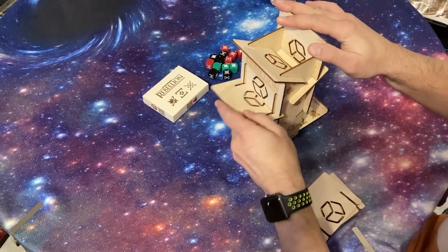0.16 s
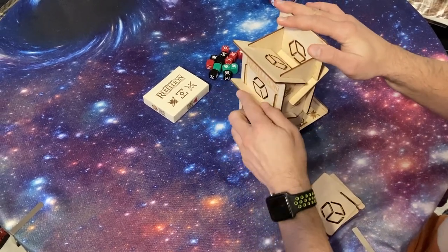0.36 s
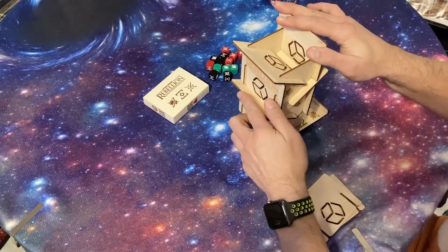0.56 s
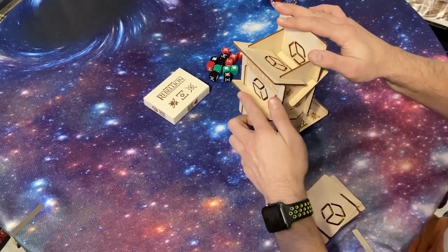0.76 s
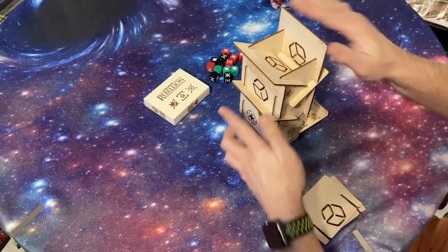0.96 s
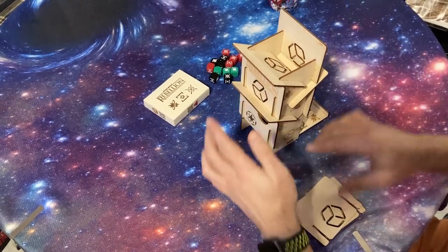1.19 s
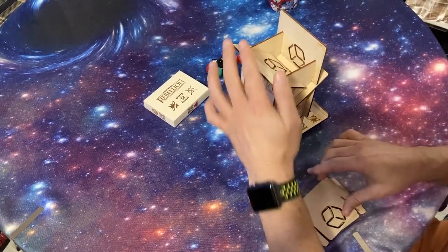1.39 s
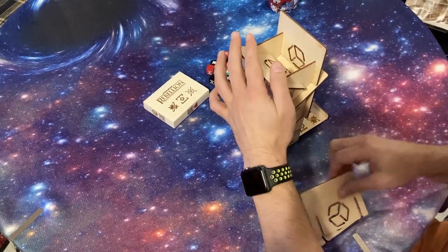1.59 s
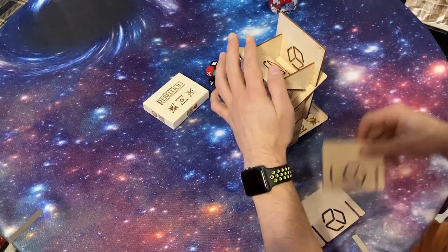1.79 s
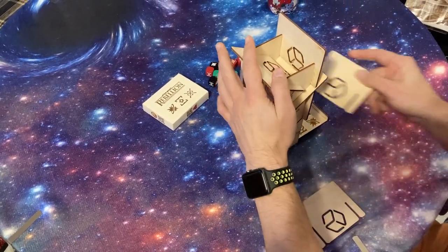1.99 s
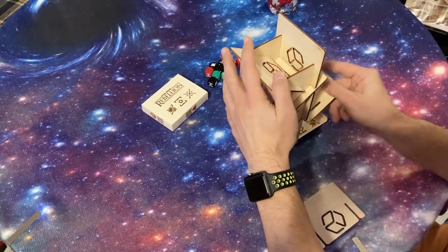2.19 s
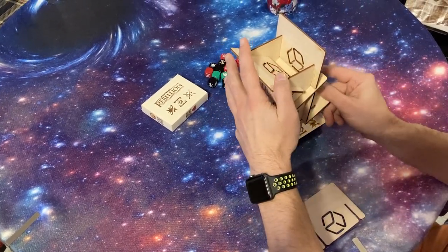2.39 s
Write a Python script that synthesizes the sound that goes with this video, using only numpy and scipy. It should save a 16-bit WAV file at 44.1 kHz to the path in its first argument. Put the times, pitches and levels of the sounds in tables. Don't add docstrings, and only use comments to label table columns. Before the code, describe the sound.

Thin plywood scraping into place, one hard wooden double snap, then faint rubbing and light taps

```python
import sys
import numpy as np
from scipy import signal
from scipy.fft import rfft, irfft, next_fast_len
from scipy.io import wavfile
from scipy.ndimage import uniform_filter1d

SR = 44100
rng = np.random.default_rng(int(sys.argv[2]) if len(sys.argv) > 2 else 0)


def to_wav(sig):
    pcm = np.clip(np.atleast_2d(sig), -1, 1) * 32767
    pcm = np.round(pcm).astype(np.int16)
    wavfile.write(sys.argv[1], SR, pcm.T)


def makeup_ratio(level_db):
    decades = np.asarray(level_db, float) / 20
    return 10 ** decades


N = 108045


def evened(x):
    return x / np.sqrt(np.mean(x ** 2) + 1e-20)


def peaked(x):
    return x / np.max(np.abs(x))


def read(points, hz):
    f, value = np.transpose(points)
    return np.interp(np.log(hz + 1), np.log(f + 1), value)


def colour(x, gain):
    size = next_fast_len(x.shape[-1] + 2048)
    spectrum = rfft(x, size) * gain(np.fft.rfftfreq(size, 1 / SR))
    return irfft(spectrum, size)[..., :x.shape[-1]]


def resonate(x, hz, width_hz):
    r = np.exp(-np.pi * width_hz / SR)
    return signal.lfilter([1 - r, 0, r - 1], [1, -2 * r * np.cos(2 * np.pi * hz / SR), r * r], x)


def drift(seconds, size):
    window = np.hanning(4410) ** max((0.02 / seconds) ** 2, 0.1)
    return evened(signal.oaconvolve(rng.standard_normal(size), window, "same"))


# hz, level_db (per Hz)
ROOM_SPECTRUM = [(28, -25), (55, 3), (80, -24.5), (118, -13.5), (170, -21.5), (400, -29), (900, -41),
                 (3000, -49.5), (15000, -54)]
# hz, likeness (0 to 1)
PORT_LIKENESS = [(60, .98), (300, .88), (700, .6), (2000, .5), (6000, .6), (7500, .95)]


def room_tone():
    room_db, swell_db, swell_s = -60, 3, 0.05
    fan_db, fan_hz, fan_width_hz = -81, 678, 3.3
    shape = lambda hz: makeup_ratio(read(ROOM_SPECTRUM, hz))
    like = lambda hz: np.clip(read(PORT_LIKENESS, hz), 0, 1)
    unlike = lambda hz: shape(hz) * np.sqrt(1 - like(hz) ** 2)
    a, b = rng.standard_normal((2, N))
    left = colour(a, shape)
    right = colour(left, like) + colour(b, unlike)
    air = evened(np.array([left, right]))
    hum = colour(air, lambda hz: 1 / (1 + (hz / 200) ** 4))
    swell = makeup_ratio(swell_db * drift(swell_s, N)) - 1
    fan = evened(resonate(rng.standard_normal(N), fan_hz, fan_width_hz))
    return makeup_ratio(room_db) * (air + hum * swell) + makeup_ratio(fan_db) * fan


def body(x, modes, wander_db=0.0):
    wander_s = 0.014
    out = 0
    for k, (hz, width_hz, db) in enumerate(modes):
        drive = x
        if wander_db:
            drive = x * makeup_ratio(wander_db * drift(wander_s, len(x)))
        ring = resonate(resonate(drive, hz, 1.7 * width_hz), hz, 1.7 * width_hz)
        out = out + (-1) ** k * makeup_ratio(db) * ring / np.sqrt(width_hz)
    return out


def slips(size):
    slips_per_s = 4000
    happens = rng.random(size) < slips_per_s / SR
    n = rng.standard_normal(size)
    return evened(happens * np.sign(n) + 0.24 * n)


# hz, level_db
FIBRE_HISS = [(1500, -45), (4000, -6.5), (5600, -11), (7200, -2.5), (9200, 1), (11500, -3), (14000, -4),
              (16000, -13.5)]


def hiss(x):
    return evened(colour(x, lambda hz: makeup_ratio(read(FIBRE_HISS, hz))))


def rub(strokes, modes, rumble_db=-12):
    fade_s, grain_db, wander_db = 0.007, 2, 3.6
    rumble_hz, rumble_width_hz = 294.7, 360
    t, press, speed = np.arange(N) / SR, np.zeros(N), np.zeros(N)
    for rows in strokes:
        s, press_db, hiss_db = np.transpose(rows)
        gate = np.clip(np.minimum(t - s[0] + fade_s, s[-1] + fade_s - t) / fade_s, 0, 1)
        press += gate * makeup_ratio(np.interp(t, s, press_db))
        speed += gate * makeup_ratio(np.interp(t, s, press_db + hiss_db))
    grain = makeup_ratio(grain_db * evened(uniform_filter1d(rng.standard_normal(N), 220)))
    clicks = slips(N) * grain
    low_noise, fibre_noise = rng.standard_normal((2, N))
    wood = press * evened(body(clicks, modes, wander_db))
    fibres = speed * hiss(fibre_noise * grain + 0.5 * clicks)
    rumble = press * evened(resonate(low_noise, rumble_hz, rumble_width_hz))
    return wood + fibres + makeup_ratio(rumble_db) * rumble


# hz, width_hz, level_db
TOWER_MODES = [(712.6, 250, -11.5), (1063, 190, 1.5), (1270, 300, 4.5), (1430, 210, 7.5),
               (1629, 180, -10.5), (2130, 690, 2.5), (2400, 300, -1), (2666, 200, -3), (6750, 520, -18.5),
               (3600, 110, -6), (4050, 860, -5), (4860, 1500, -6)]
# start_s, pressure_db, hiss_db (speed hiss over pressure)
SLOT_RUBS = [
    [(0, -60, -35), (.062, -79, -33), (.072, -64, -11), (.15, -62.5, -3.5), (.205, -43.5, -12),
     (.213, -42, -3.5), (.285, -40, -8), (.3, -53.5, -4), (.318, -44, -6.5), (.331, -43.5, 0.5)],
    [(.39, -51, -29.5), (.484, -51, -8), (.52, -56.5, -22.5), (.56, -64, -27.5)],
    [(2.376, -63.5, -21), (2.414, -66, -11), (2.45, -46.5, -23.5)],
]


def slot_scrapes():
    return rub(SLOT_RUBS, TOWER_MODES)


# hz, level_db, t60_s
TABLE_MODES = [(151, -13, 0.15), (194.3, -3.5, 0.19), (235.7, -7.5, 0.21), (269.5, 2, 0.078),
               (314.2, 0.5, 0.15), (405.3, 2.5, 0.093), (531.8, -10.5, 0.12), (692, -7.5, 0.12)]


def knock(start_s, db, ring_hz, chatter_s, thump_db=-58.0, crack_db=-3, body_db=0.0, first_hit=0.0):
    rise_s, decay_s, strike_s, thump_rise_s = 0.00053, 0.0025, 0.00002, 0.009
    ring_db, ring_width_hz, ring_loss = -0.5, 200, 0.05
    t = np.arange(SR // 4) / SR
    n, size = rng.standard_normal((2, len(t)))
    contact = np.exp(-np.maximum(t - chatter_s, 0) / decay_s)
    chatter = n * np.abs(size) * contact * np.minimum(t / rise_s, 1)
    burst = chatter + first_hit * np.exp(-t / strike_s)
    push = 0.27 * contact * np.sin(2 * np.pi * ring_hz * t)
    ring = resonate(burst + push, ring_hz, ring_width_hz + ring_loss * ring_hz)
    ring = resonate(ring, ring_hz, 3 * ring_width_hz)
    sound = makeup_ratio(body_db) * peaked(body(burst, TOWER_MODES))
    sound += makeup_ratio(ring_db) * peaked(ring) + makeup_ratio(crack_db) * peaked(hiss(burst))
    thump = 0
    for k, (hz, mode_db, t60_s) in enumerate(TABLE_MODES):
        thump = thump + (-1) ** k * makeup_ratio(mode_db - 60 * t / t60_s) * np.sin(2 * np.pi * hz * t)
    sound += makeup_ratio(thump_db) * peaked(thump * (1 - np.exp(-(t / thump_rise_s) ** 2)))
    return np.pad(makeup_ratio(db) * sound, (round(start_s * SR), N))[:N]


# start_s, level_db, ring_hz, chatter_s, thump_db
SNAP_EVENTS = [
    (0, -57.5, 526, 0.027, 9.5),
    (0.338, -16.5, 992, 0.0023, -1),
    (0.371, -20, 1413, 0.0071, -10),
    (2.373, -54, 1220, 0.01, -6.5),
    (2.392, -53, 1153, 0.0018, 2.5),
    (2.435, -45.5, 1540, 0.043, -4),
]


def snaps():
    return sum(knock(*row) for row in SNAP_EVENTS)


def bump(start_s, db, hz):
    rise_s, cycles = 0.0096, 3.8
    t = np.maximum(np.arange(N) / SR - start_s, 0)
    swell = (1 - np.exp(-t / rise_s)) * np.exp(-t * hz / cycles)
    return 2 * makeup_ratio(db) * swell * np.sin(2 * np.pi * hz * t)


# start_s, level_db, pitch_hz
HAND_BUMPS = [(0.227, -48, 116.4), (0.267, -44.5, 382), (0.519, -53, 117.8), (0.871, -54, 404),
              (.09, -54, 235), (0.189, -54, 179.4), (.381, -32.5, 269.5), (.03, -55, 139.7),
              (0.754, -65, 400), (2.378, -57, 350), (2.41, -50.5, 277), (.90, -60.5, 247.6),
              (0.968, -53, 273), (0.972, -48, 121), (1.442, -63, 110.1), (1.721, -53.5, 139.7),
              (2.041, -55.5, 102.5)]


def hand_bumps():
    return sum(bump(*row) for row in HAND_BUMPS)


# start_s, level_db, ring_hz, chatter_s
EDGE_PINGS = [(.0715, -56, 1477, .004), (.109, -52, 1730, .004), (.133, -53, 1960, .008),
              (.190, -39, 1341, 0.0073), (.212, -37.5, 3600, 0.007), (.221, -41, 1300, 0.0053),
              (.267, -37, 3600, 0.0121), (.270, -38.5, 2350, .005), (.333, -27, 1194, 0.0018),
              (.335, -33, 1810, 0.0016), (.340, -19, 1346, .002), (.340, -25, 4050, .003),
              (.339, -33.5, 6770, 0.0045), (.372, -26, 1116, 0.0015), (.374, -29.5, 7100, 0.0058),
              (.375, -28.5, 7970, 0.0022), (.376, -31.5, 5090, 0.0028), (.374, -23.5, 3438, 0.0033),
              (.377, -26.5, 2133, .002), (.376, -38.5, 6220, .002), (.918, -46.5, 7380, 0.0026),
              (.926, -46.5, 7240, 0.0023), (0.153, -48.5, 2400, 0.0035), (.173, -45.5, 2450, 0.0066),
              (0.087, -63, 6500, .015), (0.242, -40, 2450, .006), (.949, -63, 1910, .002),
              (.976, -53, 1500, 0.0038), (1.62, -62, 2315, 0.021), (1.63, -53, 4310, 0.018),
              (1.855, -56.5, 1541, 0.006), (1.92, -63, 1530, 0.0046), (2.373, -64, 3670, 0.0018),
              (2.392, -56, 1900, 0.0022), (2.393, -63.5, 3750, 0.0017), (2.432, -49.5, 1994, 0.012),
              (2.436, -55.5, 4587, .012), (0.965, -61.5, 7450, .002)]


def pings():
    return sum(knock(*row, crack_db=-27, body_db=-21.5, first_hit=1.7) for row in EDGE_PINGS)


# start_s, level_db, ring_hz, chatter_s, crack_db
LIGHT_TAPS = [(.133, -48.5, 2567, 0.0052, -30), (0.156, -46, 3632, .018, -32),
              (0.213, -33, 2329, 0.0035, -14), (.255, -34.5, 3632, .007, -32.5),
              (0.2626, -24.5, 1360, 0.0012, -25.5), (0.2808, -25, 1260, 0.0023, -27),
              (0.3377, -15, 2170, 0.003, -14.5), (0.732, -63.5, 1306, 0.0024, -17),
              (.9205, -38, 846.4, 0.00454, -0.5), (0.9597, -50.5, 3390, 0.0016, 11.5),
              (0.923, -49, 4740, .002, -7), (1.565, -52.5, 4120, 0.0095, 0),
              (1.692, -50.5, 1440, 0.0058, -13), (1.719, -43, 1430, .005, -16),
              (1.735, -39.5, 1440, 0.00505, -9), (1.872, -49.5, 1506, .010, -14)]


def taps():
    out = 0
    for *touch, crack_db in LIGHT_TAPS:
        out = out + knock(*touch, crack_db=crack_db, body_db=-14.5, first_hit=6)
    return out


# hz, width_hz, level_db
GRIP_COLOUR = [(330, 270, -1), (810, 510, -3), (1280, 520, -2.5), (2120, 750, -5), (3650, 1460, -5)]
# start_s, pressure_db, hiss_db
GRIP_RUBS = [
    [(.85, -81.5, 1.5), (.893, -66, -6), (.91, -70, 1), (.936, -62, -9), (.976, -57, -19),
     (1.06, -103, -20.5)],
]


def grip_release():
    return rub(GRIP_RUBS, GRIP_COLOUR, rumble_db=-2.5)


# hz, width_hz, level_db
SKIN_COLOUR = [(3170, 1350, -4.5), (4830, 940, -3)]
# start_s, pressure_db, hiss_db
FINGER_RUBS = [
    [(1.38, -96.5, 4), (1.42, -82.5, 11), (1.474, -87, 1.5), (1.49, -60, -4), (1.508, -63.5, -1),
     (1.525, -82, -8), (1.55, -88, -7)],
]


def finger_brush():
    return rub(FINGER_RUBS, SKIN_COLOUR)


# hz, width_hz, level_db
PANEL_MODES = [(790, 180, -5.5), (1440, 69.5, -3), (1940, 350, -4), (2350, 94, -3.5), (2846, 300, 0.5),
               (3395, 540, -10.5), (3840, 280, -6.5), (4810, 520, 2.5)]
# start_s, pressure_db, hiss_db
STACK_RUBS = [
    [(1.552, -77, 2), (1.57, -64.5, 7), (1.63, -52.5, 3.5), (1.68, -67, 4.5)],
    [(1.686, -65, 9), (1.698, -49, -0.5), (1.708, -66.5, -2.5), (1.716, -57.5, 2), (1.732, -48.5, 2.5),
     (1.758, -56.5, 6), (1.768, -66, 4.5)],
    [(1.77, -68.5, 10.5), (1.834, -71.5, 12.5), (1.88, -65, 5.5), (1.9, -74, 19.5), (1.956, -68, 13),
     (1.97, -100, -8.5), (2.0, -100, 5.5)],
]


def stack_drag():
    return rub(STACK_RUBS, PANEL_MODES)


# hz, width_hz, level_db
EDGE_MODES = [(686, 320, -10.5), (1505, 185, 6), (1890, 260, -2), (2247, 115, 2.5), (3520, 1300, 1.5),
              (4550, 330, -4)]
# start_s, pressure_db, hiss_db
SEARCH_RUBS = [
    [(2.0, -94.5, -6.5), (2.1, -81, -11), (2.15, -67, -6.5), (2.19, -79, -3.5), (2.236, -87, -6.5),
     (2.25, -69.5, -1.5), (2.3, -70, -3.5), (2.36, -77.5, -1)],
]


def slot_search():
    return rub(SEARCH_RUBS, EDGE_MODES)


def apart(hz):
    return 1 / (1 + (650 / (hz + 1)) ** 4) / (1 + (hz / 6000) ** 12)


# hz, t60_s
ROOM_DECAY = [(200, 0.55), (1000, 0.36), (4000, 0.35), (12000, 0.21)]


def echo(x):
    tail_db, near_db, near_s, path_turn_s, gap = -11, -13, 0.006, 0.012, 300
    turn = np.pi * np.arange(N) / SR / path_turn_s
    out = 0
    for k in range(3):
        shared, own = rng.standard_normal(SR // 2), rng.standard_normal((2, SR // 2))
        hz, t, z = signal.stft(shared + colour(own, apart), SR, nperseg=256)
        decay = makeup_ratio(-60 * t / read(ROOM_DECAY, hz)[:, None])
        tail = signal.istft(z * decay, SR, nperseg=256)[1]
        tail = np.pad(tail, ((0, 0), (gap, 0))) / np.linalg.norm(tail[0])
        size = tail.shape[1]
        near = np.outer([1, -1], rng.standard_normal(size)) * np.exp(-np.arange(size) / SR / near_s)
        near = colour(near / np.linalg.norm(near[0]), apart)
        path = makeup_ratio(tail_db) * tail + makeup_ratio(near_db) * near
        part = x * np.cos(turn + k * np.pi / 3) * np.sqrt(2 / 3)
        out = out + signal.fftconvolve(part[None], path, axes=1)[:, :N]
    return out


def scene():
    wood = slot_scrapes() + snaps() + hand_bumps() + pings() + taps()
    wood += grip_release() + finger_brush() + stack_drag() + slot_search()
    return wood + echo(wood) + room_tone()


def roll_off(x):
    return signal.sosfilt(signal.butter(12, 15900, fs=SR, output="sos"), x)


# hz, left_lead_rad
PORT_LEAD = [(1100, -1.1), (1700, -1.1), (2900, 1.9), (4000, 0.89), (5500, 1.7), (6600, -0.26)]
# hz, left_over_right_db
PORT_LEVEL = [(60, -1), (180, .5), (550, 2.5), (2400, 2.5), (5000, .5), (7000, 0)]


def record(dry):
    delay_s, delay_from_hz, ceiling_hz = 0.000222, 6950, 15950

    def lead(hz):
        phase = read(PORT_LEAD, hz) * np.minimum(hz / 1700, 1)
        return phase - 2 * np.pi * delay_s * np.maximum(hz - delay_from_hz, 0)

    port = lambda hz: makeup_ratio(read(PORT_LEVEL, hz) / 2) * np.exp(0.5j * lead(hz))
    pair = np.array([colour(dry[0], port), colour(dry[1], lambda hz: 1 / port(hz))])
    mix = colour(pair, lambda hz: 1 / (1 + (hz / ceiling_hz) ** 120))
    return roll_off(mix)


dry = scene()
out = record(dry)
to_wav(out)
```